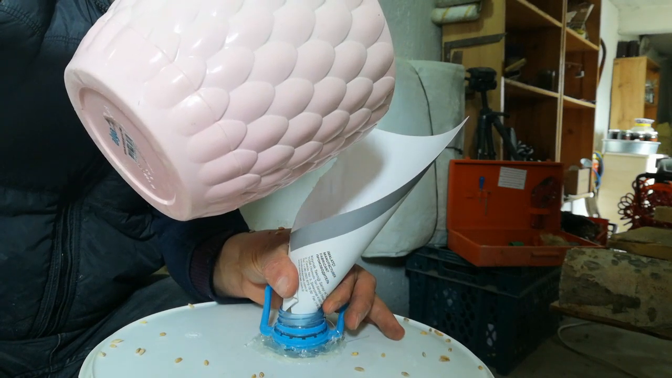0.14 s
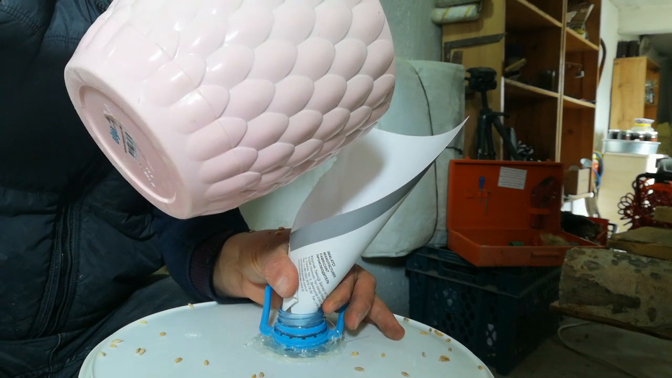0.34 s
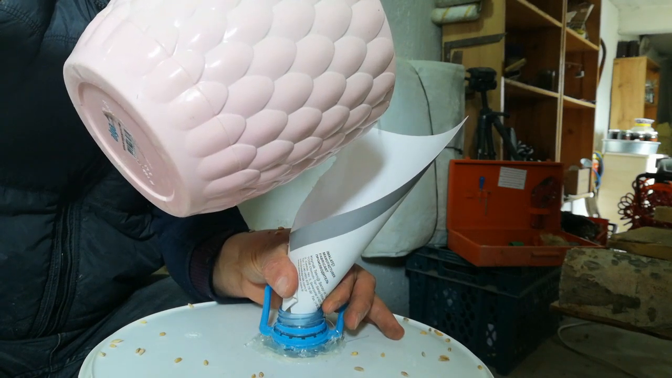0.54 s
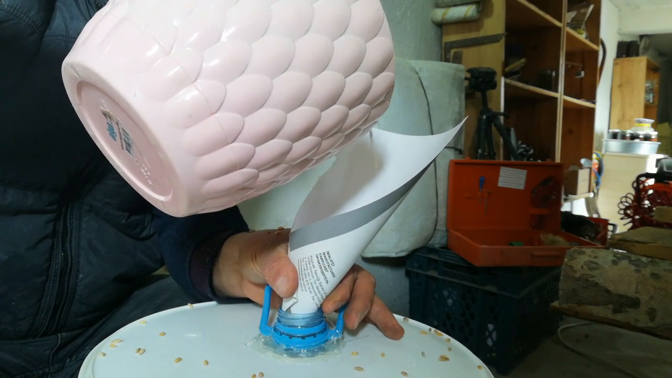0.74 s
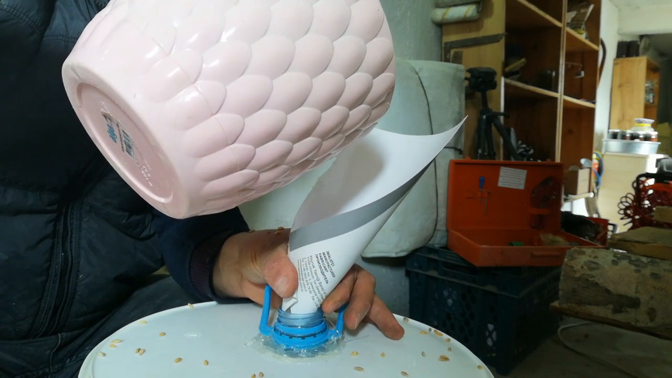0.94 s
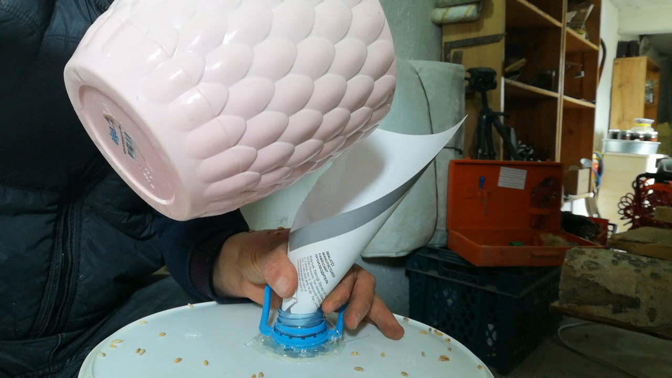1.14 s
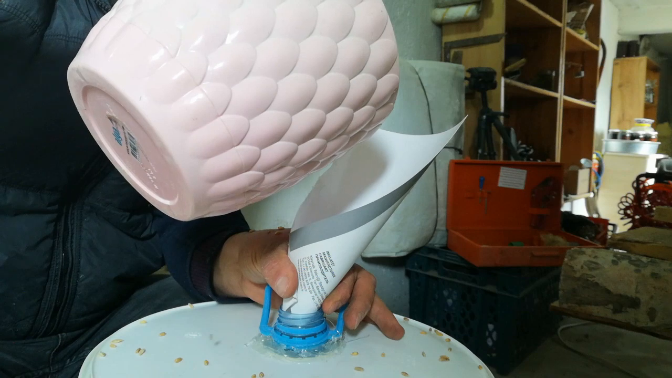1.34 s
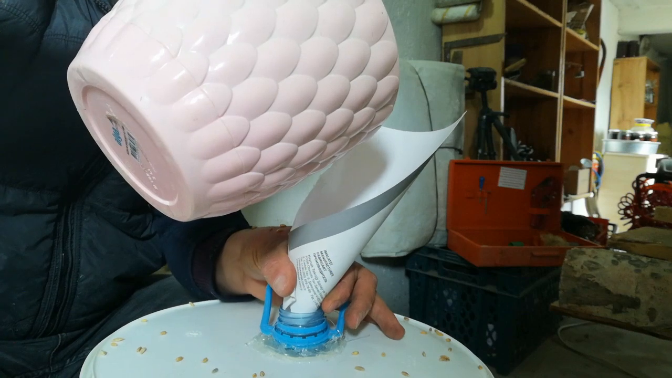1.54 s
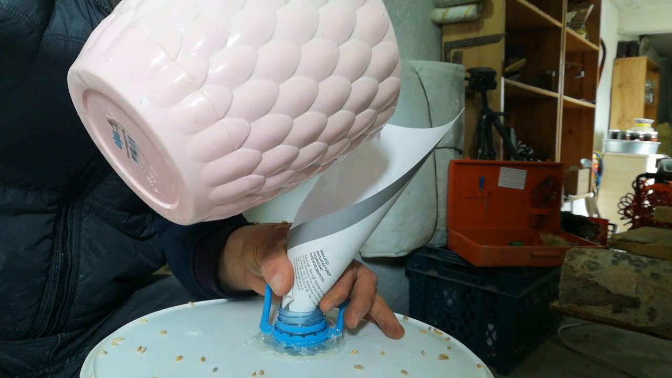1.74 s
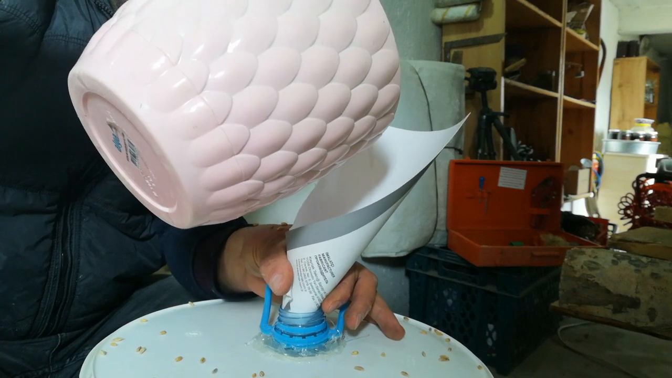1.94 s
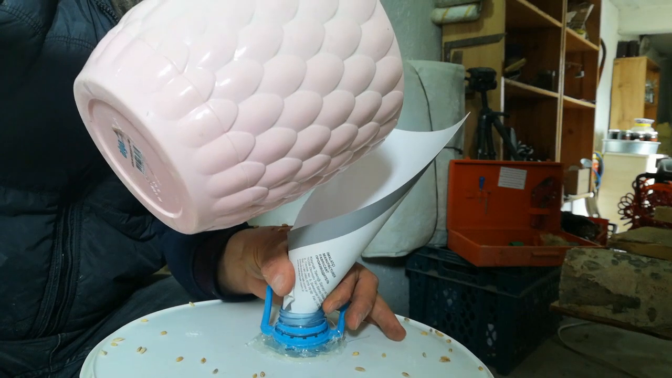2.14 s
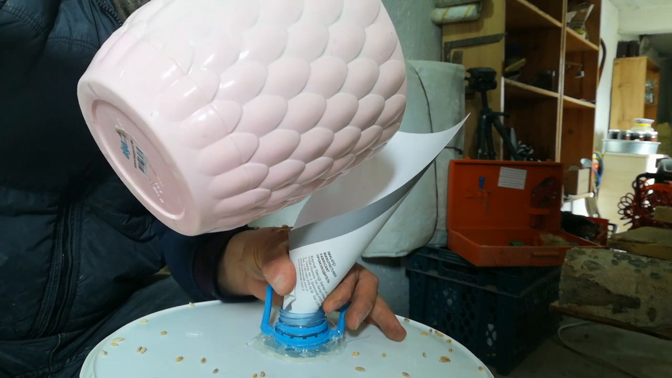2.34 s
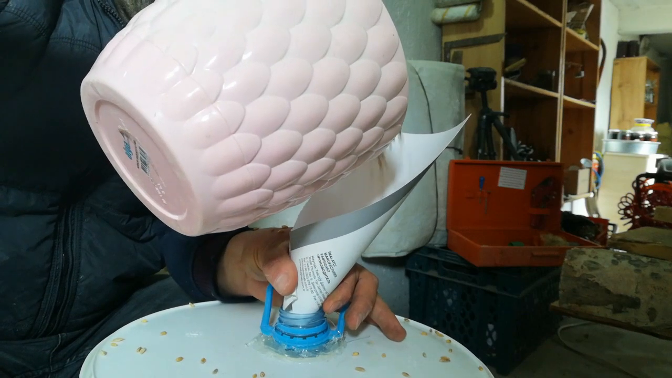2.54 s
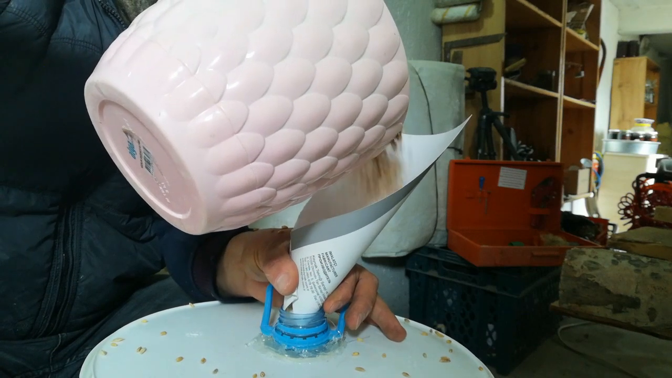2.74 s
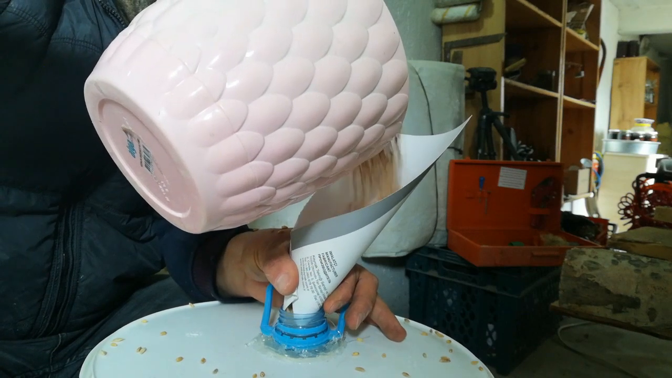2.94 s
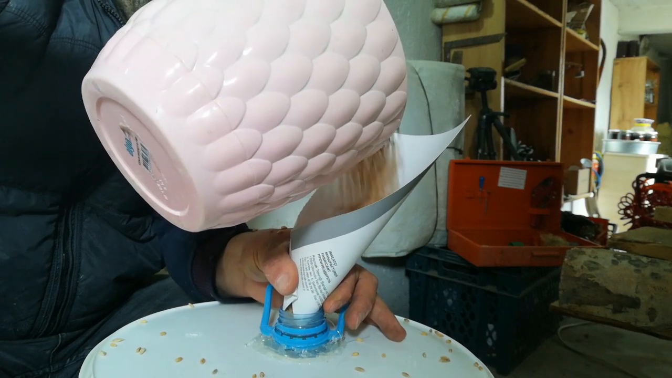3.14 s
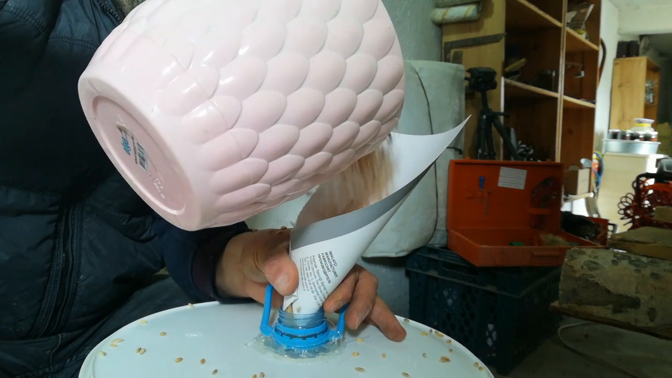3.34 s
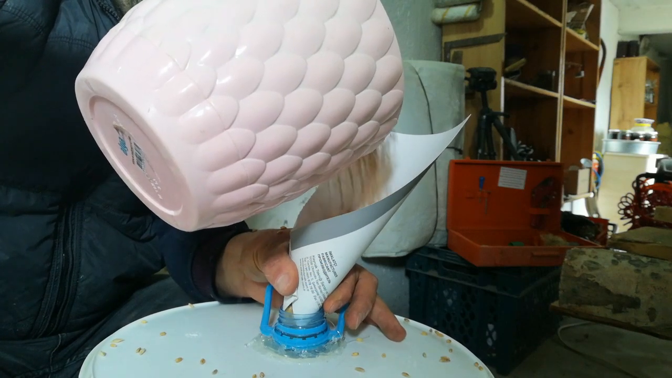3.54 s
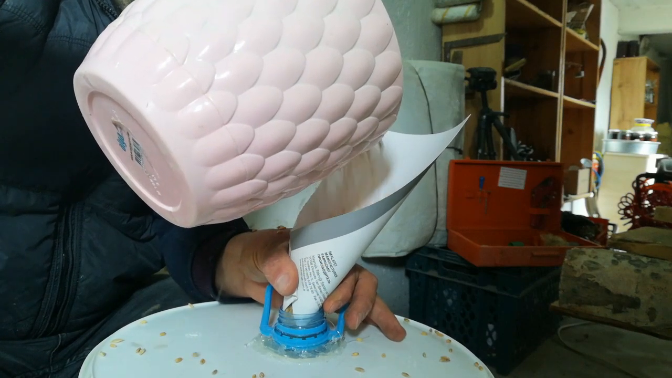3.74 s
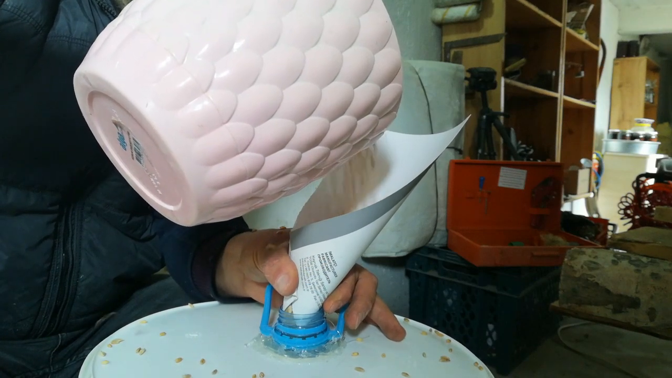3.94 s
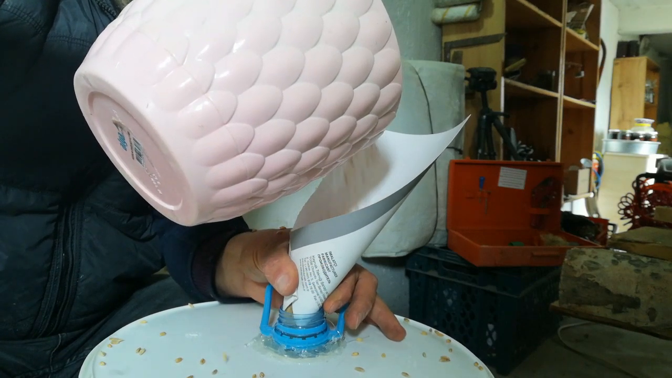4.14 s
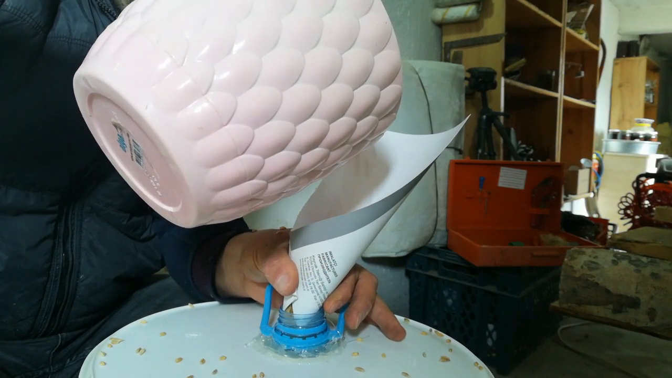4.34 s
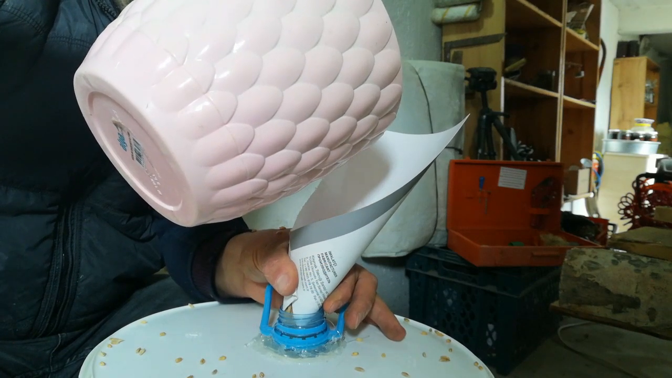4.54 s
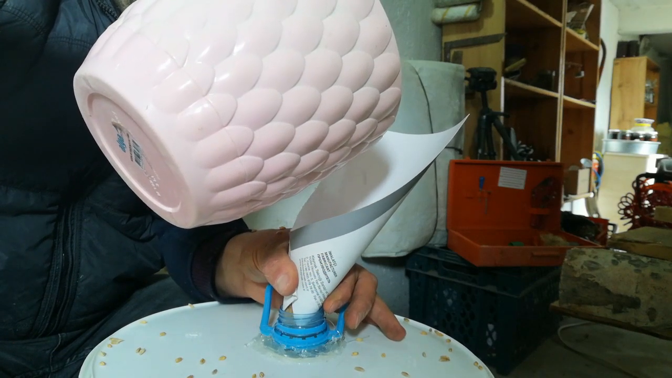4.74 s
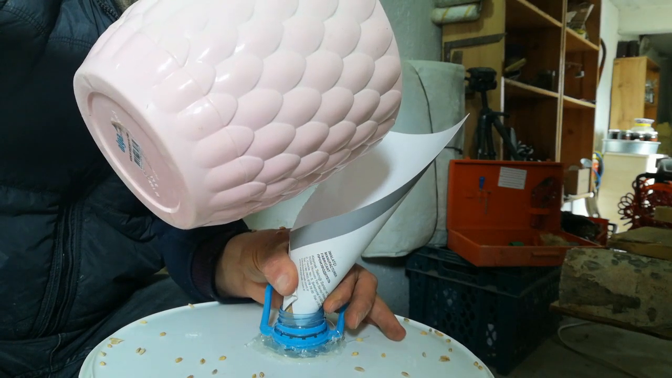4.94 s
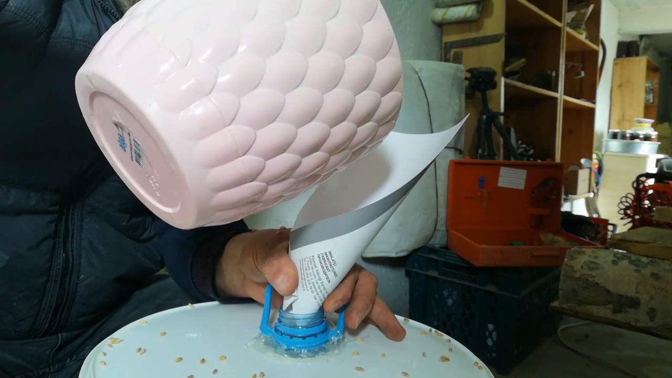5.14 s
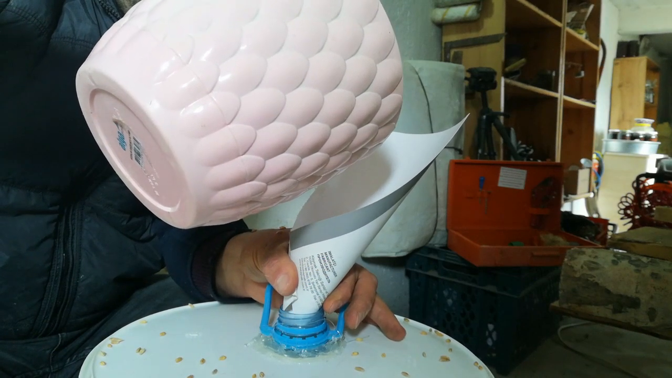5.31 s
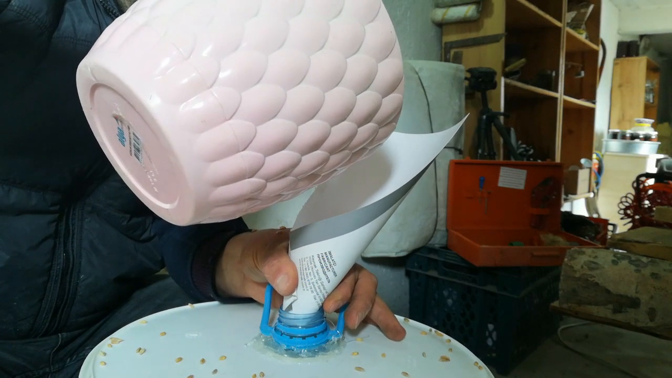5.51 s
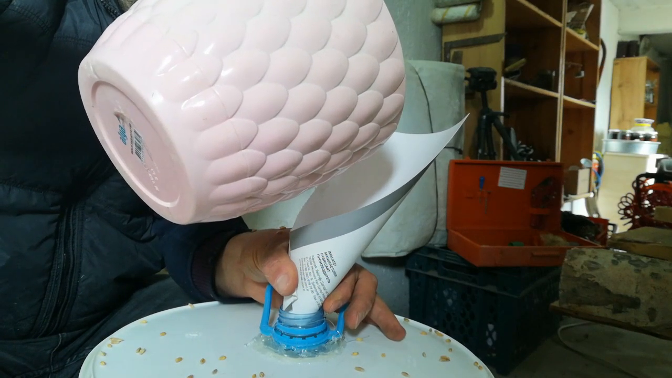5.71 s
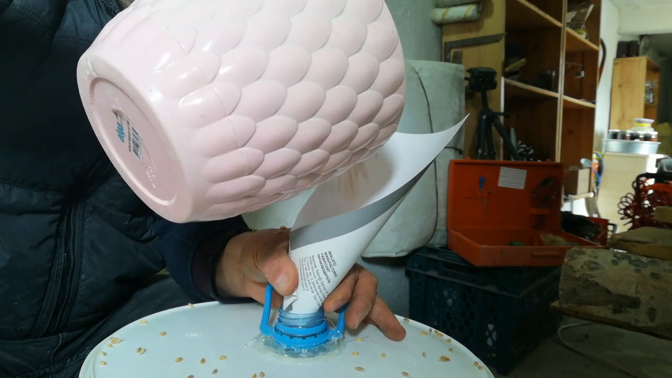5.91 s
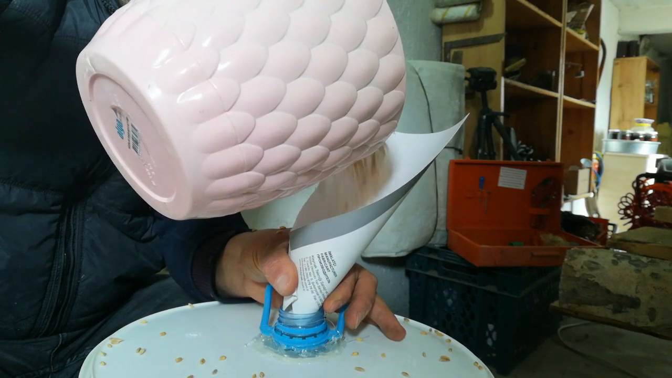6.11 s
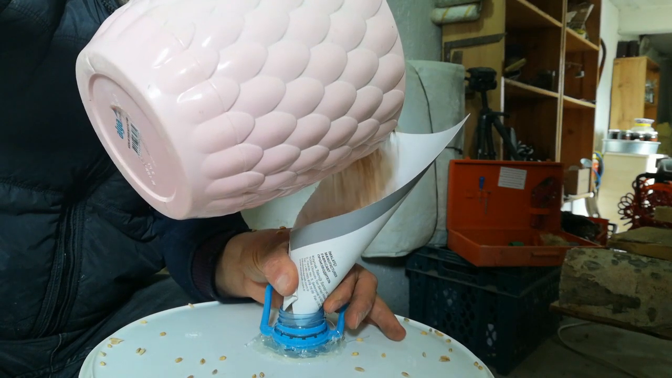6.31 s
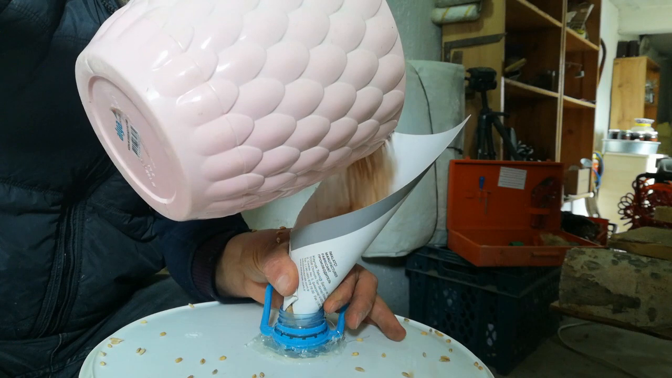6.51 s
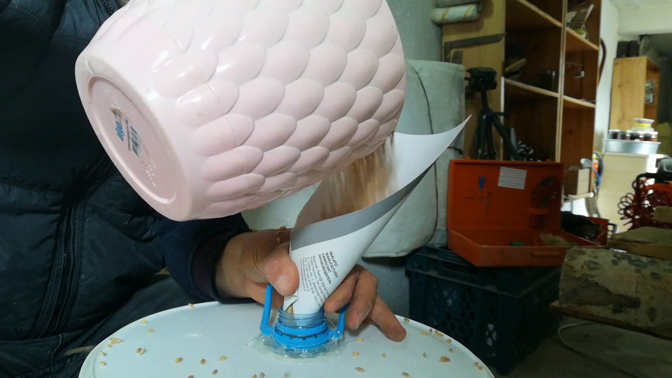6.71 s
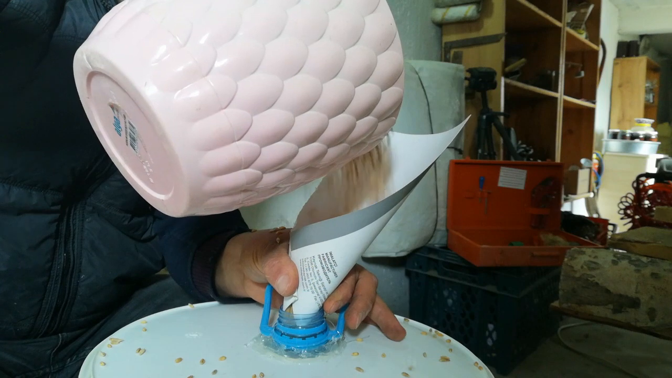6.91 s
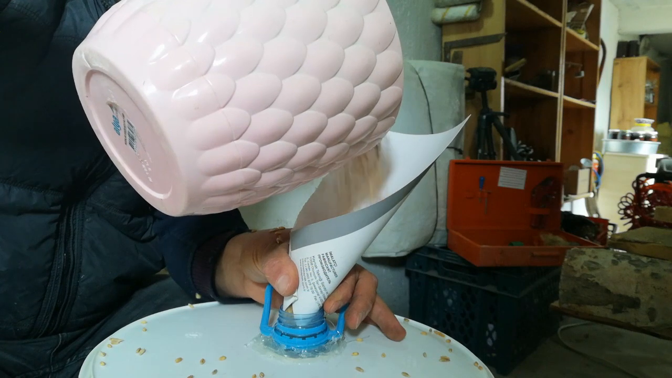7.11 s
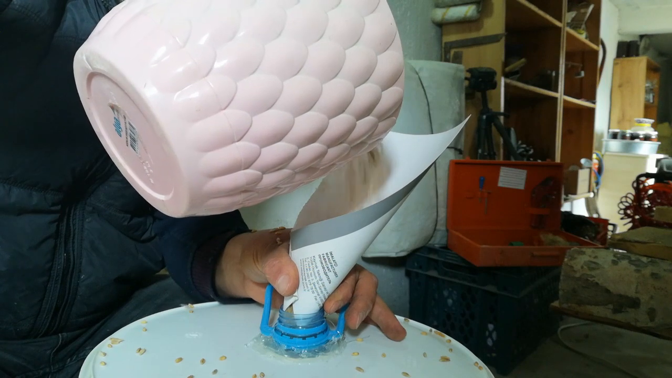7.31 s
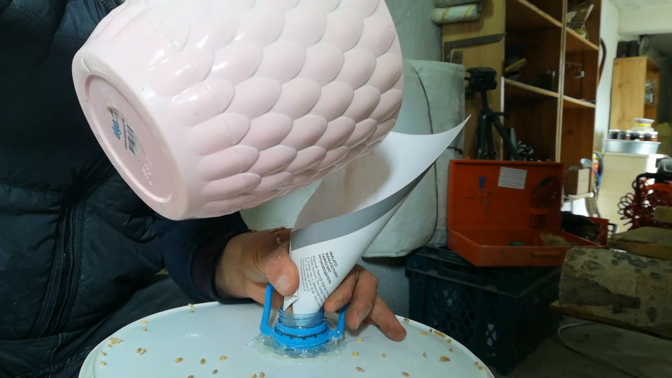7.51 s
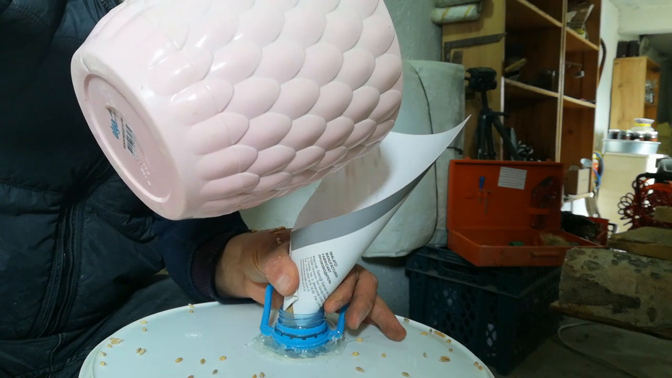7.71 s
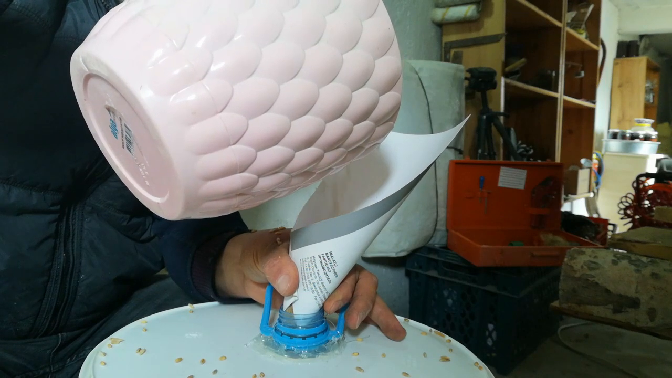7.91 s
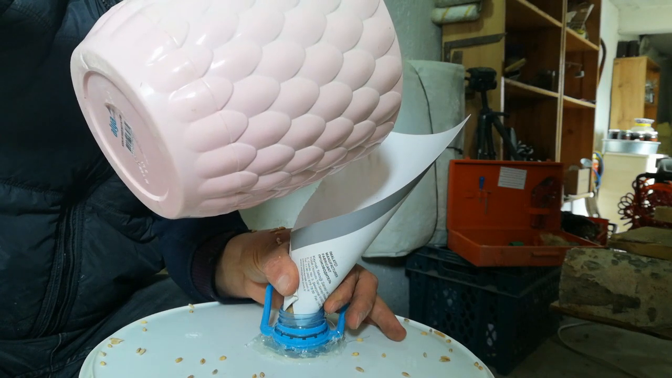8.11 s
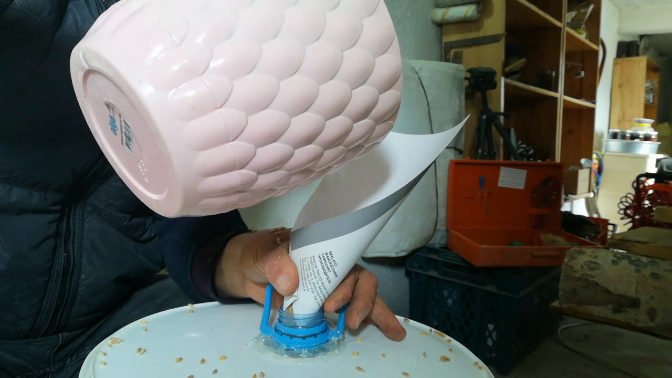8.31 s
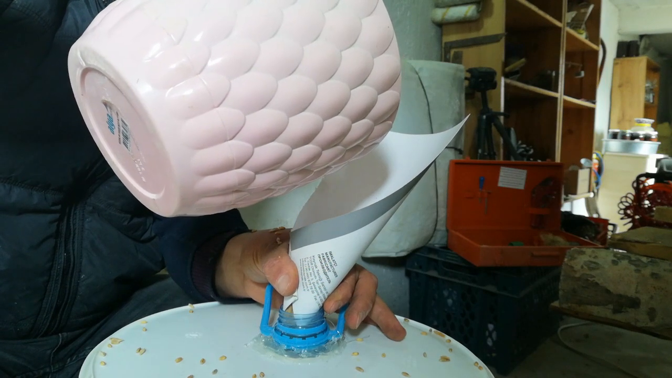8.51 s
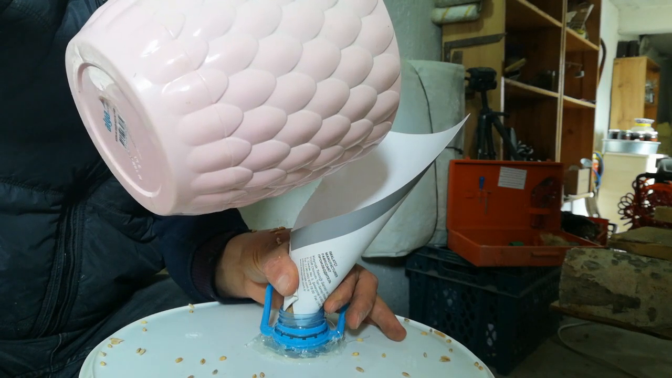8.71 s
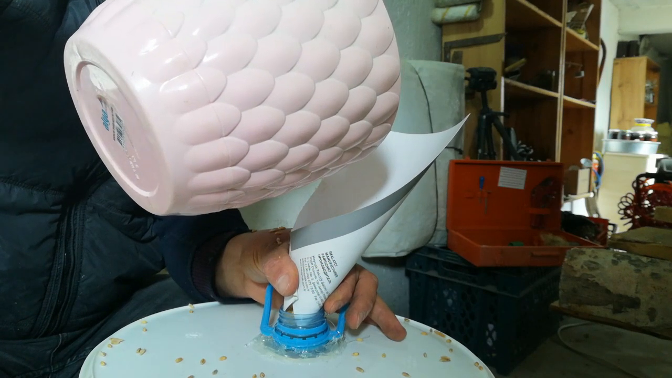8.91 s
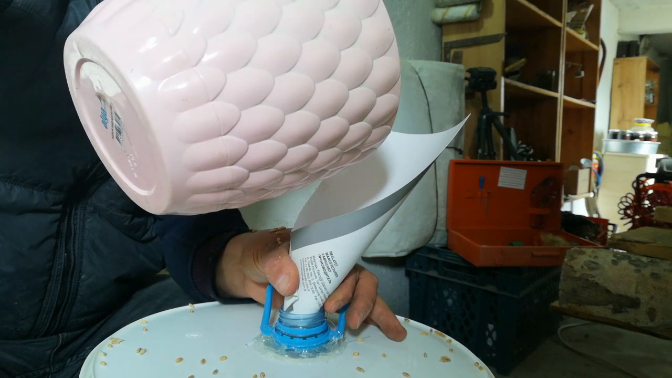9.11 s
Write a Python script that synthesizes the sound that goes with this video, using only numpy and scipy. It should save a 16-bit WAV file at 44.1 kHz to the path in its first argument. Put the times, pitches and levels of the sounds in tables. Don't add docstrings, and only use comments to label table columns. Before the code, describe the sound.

Dry seeds hiss down a paper funnel into a plastic bottle in three loud pours, thinning to sharp separate ticks between them, close up.

```python
import sys
import numpy as np
from scipy import signal
from scipy.fft import rfft, irfft, next_fast_len
from scipy.io import wavfile
from scipy.ndimage import uniform_filter1d

SR = 44100
rng = np.random.default_rng(int(sys.argv[2]) if len(sys.argv) > 2 else 0)


def wav_record(signal):
    frames = np.transpose(np.atleast_2d(signal))
    bounded = np.clip(frames, -1, 1)
    quanta = np.round(bounded * 32767).astype(np.int16)
    wavfile.write(sys.argv[1], SR, quanta)


def makeup_ratio(level_db):
    decades = np.asarray(level_db, float) / 20
    return 10 ** decades


N = 403956

# (start [s], crest [s], crest level [dB], pot runs low [s], extra fade [dB/s])
POURS = [
    (-1.3, -.6, -14, .9, 45),
    (2.57, 3.3, -12.8, 4.62, 45),
    (6.052, 6.6, -12.8, 8.1, 4.5),
]
# (start [s], length [s], level [dB], brightness [dB])
SPILLS = [(1.1, .3, -40, -2), (1.3, .47, -50, 0), (1.78, .22, -30, -9), (2.0, .2, -29, -8),
          (2.24, .04, -24, -15), (2.44, .14, -35, -2), (4.8, .62, -36, -.5), (5.4, .17, -44, -4),
          (5.55, .25, -56, -8), (5.931, .06, -24, -8), (9.13, .1, -31, 0)]
# (frequency [Hz], left [dB], right [dB])
PORT_COLOUR = [(40, -33, -26), (417, -19, -21), (597, -25.5, -23), (772, -14, -16), (1310, -8, -7.5),
               (1940, -4.5, -6), (2655, -4, 0.5), (4150, 0, -2.5), (5300, -2.5, 0), (6160, 0, -2),
               (8240, -8, 4), (9080, -9, 2.5), (10750, -20, -8.5), (15500, -35, -20)]
# (frequency [Hz], width [Hz], level [dB])
PAPER_MODES = [(732, 84, 4.5), (1057, 200, 3.5), (1330, 130, 4), (1820, 110, 3), (3350, 150, 3),
               (4820, 450, 1.2), (6300, 650, 1.5)]
# (time [s], peak level [dB], brightness [dB], rustle [dB])
FIRST_TAIL_SEEDS = [(0.1161, -7, -6, 3), (0.164, -5, -5, -15), (0.189, -10, -11, 1), (0.2523, -3, -14, -2),
                    (0.3252, -9, -19, 2), (0.4015, -2, -12, -6), (0.4643, -12, -14, 1),
                    (0.5043, -5, -12, -2), (0.5222, -8, -22, -3), (0.5686, -5, -8, 0), (0.6135, -3, -11, 1),
                    (0.6639, -4, -14, -3), (0.7447, -4, -13, -1), (0.8435, -5, -15, 2),
                    (0.9009, -9, -11, -1), (0.9388, -9, -8, 4), (0.9981, -6, -8, -5), (1.0226, -4, -14, -3),
                    (1.0695, -8, -7, 3), (1.0939, -7, -14, -6)]
SPARSE_SEEDS = [(1.1228, -7, -17, -3), (1.1404, -8, -18, -3), (1.1458, -4, -24, -4), (1.2002, -4, -19, -4),
                (1.2614, -13, -12, -3), (1.2705, -5, -16, 3), (1.3169, -8, -7, 5), (1.3488, -4, -13, -3),
                (1.3768, -11, -14, -7), (1.4282, -12, -4, -3), (1.4314, -9, -12, -6),
                (1.4785, -16, -11, -6), (1.5125, -20, -15, 2), (1.5509, -23, -9, -3), (1.5589, -3, -12, -3),
                (1.5778, -3, -12, -5), (1.6134, -17, -13, -4), (1.6606, -25, -11, -1),
                (1.6836, -10, -13, 1), (1.724, -16, -20, -2), (1.7764, -12, -14, -3),
                (1.7858, -7, -15, -13), (1.8138, -10, -15, -3), (1.8244, -14, -17, -3),
                (1.8394, -11, -15, -3), (1.8572, -9, -10, -3), (1.8754, -9, -11, -1),
                (1.8954, -10, -12, 11)]
DRIBBLE_SEEDS = [(1.918, -2, -6, -3), (1.9405, -6, -15, -3), (1.9495, 1, -8, -3), (1.9674, -6, -14, 4),
                 (1.9939, -6, -7, -4), (2.0243, -6, -7, -7), (2.0467, -8, -14, 11), (2.0712, -2, -17, -3),
                 (2.0774, 0, -8, -4), (2.1171, -7, -7, -3), (2.155, -9, -14, 0), (2.176, -6, -17, -3),
                 (2.1879, -6, -18, -11), (2.2204, -9, -11, -3), (2.2344, -3, -17, -3),
                 (2.2418, -2, -11, -4), (2.2643, -3, -18, -3), (2.2734, -11, -13, -3), (2.2917, -4, -19, 5),
                 (2.3384, -8, -13, 1), (2.3605, -6, -16, -3), (2.4409, -4, -12, -6), (2.4848, -9, -16, -5),
                 (2.5177, -7, -7, -2), (2.5511, -5, -12, -6), (2.582, -8, -13, -3), (2.6155, -2, -14, -3),
                 (2.7018, -5, -9, -3), (2.7197, -3, -6, -1)]
TRICKLE_SEEDS = [(4.6573, -6, -9, 0), (4.7995, -10, -12, -3), (4.8504, -12, -9, -2), (4.8873, -9, -12, 2),
                 (5.0789, -15, -11, 0), (5.1034, -13, -13, 0), (5.1522, -10, -15, 0),
                 (5.2679, -18, -15, -2), (5.2854, -19, -15, -2), (5.3363, -18, -18, -4),
                 (5.3936, -16, -17, -2), (5.4136, -19, -11, -12), (5.4365, -11, -13, -1),
                 (5.466, -18, -16, -6), (5.4874, -20, -16, -3), (5.5174, -18, -17, 6),
                 (5.5468, -16, -17, -2), (5.5614, -20, -14, 9), (5.5962, -16, -15, -4),
                 (5.674, -28, -14, -2), (5.7538, -31, -19, -1), (5.8257, -35, -13, -2),
                 (5.8386, -32, -16, 5), (5.9314, -7, -13, -5), (5.9534, -6, -14, -2), (5.9674, -2, -9, -1),
                 (6.0287, -9, -10, 3), (6.0606, -5, -6, -2), (6.0776, -5, -15, 2), (6.1114, -2, -12, 5)]
LAST_TAIL_SEEDS = [(7.8208, -1, -8, 2), (7.9305, -9, -9, -1), (8.0039, -8, -6, -4), (8.0543, -7, -11, -2),
                   (8.0722, -6, -12, -5), (8.1276, -9, -6, 0), (8.1775, -8, -14, -1), (8.2144, -7, -8, 3),
                   (8.3675, -17, -9, -1), (8.394, -11, 1, -9), (8.5955, -14, -11, 2),
                   (8.6299, -12, -12, -4), (8.6818, -6, -11, -6), (8.7582, -11, -8, -1),
                   (8.9392, -13, -12, -3), (9.1388, -8, -9, -7)]
# (frequency [Hz], width [Hz], level [dB])
BOTTLE_MODES = [(226, 33, 4), (296, 80, -3), (375.4, 40, -2), (459, 33, -12)]
# (frequency [Hz], rms level [dB])
HUM_PARTIALS = [(115, -60), (153, -48), (306, -74)]
# (frequency [Hz], density [dB per Hz])
ROOM_AIR = [(30, -9), (100, -12), (170, -10), (260, -18), (500, -26), (2000, -17), (5000, -23), (9000, -26),
            (15000, -32)]

STEP = 64
RISE_DB, SURGE_DB, SURGE_S = 9, 4.2, .33
DRAIN_DB_PER_S, SPILL_STOP_DB_PER_S = 5.5, 200
BRIGHT_DB, BRIGHT_AFTER_DB, DULLING_DB_PER_S = 1, 4, 2.2
SWING_S, SWING_WIDTH_S, SWING_DB, PAN_DB = .42, .15, -8, 2.6
SEEDS_PER_S, FEWEST_PER_S, MOST_PER_S, SIZE_SPREAD_DB = 500, 500, 6000, 3.1
PLACES, RING = 12, 8192
LEAD = 64
TICK_T60_S, RATTLE_T60_S, ROOM_T60_S, TICK_DB = .005, .017, .25, -2.5
RATTLE_RISE_S = .00095
BODY_DB, BODY_SLOPE, BODY_SURGE_DB = -6.3, 1.05, 1.5
BOOM_DB, BOOM_SLOPE, BOOM_SURGE_DB, BOOM_KNEE_DB = -46, .15, 9, -35
DROP_S = .15
ROOM_AIR_DB = -52


def flow():
    t = np.arange(0, N + STEP, STEP) / SR
    power, treble, surge, pan_db = makeup_ratio(-124), makeup_ratio(-130), 0, PAN_DB
    for start, crest, crest_db, empty, fade_db in POURS:
        since = np.maximum(t - crest, 0)
        settled = np.minimum(since / SURGE_S, 1)
        rising = np.clip((t - start) / (crest - start), 0, 1)
        db = crest_db - RISE_DB * (1 - rising) ** 1.5 - SURGE_DB * settled
        db = db - DRAIN_DB_PER_S * since - fade_db * np.maximum(t - empty, 0)
        bright_db = BRIGHT_DB + BRIGHT_AFTER_DB * settled - DULLING_DB_PER_S * since
        power = power + (t > start) * makeup_ratio(2 * db)
        treble = treble + (t > start) * makeup_ratio(2 * (db + bright_db))
        surge = surge + rising * (1 - settled)
        pan_db = pan_db + SWING_DB * np.exp(-((t - crest - SWING_S) / SWING_WIDTH_S) ** 2)
    for start, length, level_db, bright_db in SPILLS:
        db = level_db - SPILL_STOP_DB_PER_S * np.maximum(t - start - length, 0)
        power = power + (t > start) * makeup_ratio(2 * db)
        treble = treble + (t > start) * makeup_ratio(2 * (db + bright_db))
    curves = (10 * np.log10(power), 10 * np.log10(treble), surge, pan_db)
    return [np.interp(np.arange(N) / SR, t, c) for c in curves]


def stream(rattle_db, sizzle_db, body_db, pan_db):
    size = next_fast_len(N + RING, True)
    when, thinning, grain, place = rng.random((int(MOST_PER_S * N / SR), 4)).T
    at = (when * N).astype(int)
    rate = SEEDS_PER_S * makeup_ratio(1.3 * (rattle_db + 25.5) + 0.5 * walk(18))
    rate = np.clip(rate, FEWEST_PER_S, MOST_PER_S)
    mean_rate = np.clip(SEEDS_PER_S * makeup_ratio(1.264 * (rattle_db + 28)), FEWEST_PER_S, MOST_PER_S)
    falls = np.clip((rate[at] / MOST_PER_S - thinning) * 50 + .5, 0, 1)
    blow = falls * makeup_ratio(-SIZE_SPREAD_DB * np.log(grain + 0.012)) / np.sqrt(mean_rate[at])
    spot = (place * PLACES).astype(int)
    total = 0
    for k, bright_db in enumerate(np.linspace(-3, 3, PLACES)):
        impacts = np.bincount(at[spot == k], blow[spot == k], N)
        total = total + rfft(impacts, size) * rfft(landing(bright_db, -4.5, bounce=0.32), size)
    hz = np.fft.rfftfreq(size, 1 / SR)
    low = 1 / (1 + (hz / 2200) ** 4)
    high = 1 / (1 + (6600 / (hz + 1)) ** 6)
    heap = 1 / (1 + ((hz - 4600) / 500) ** 2)
    parts = ((heap, 2.41 * rattle_db + 6),
             (low, body_db - 1.5 + .8 * walk(9)),
             (1 - low - high, rattle_db + 3.5 + np.array([pan_db, -pan_db]) / 2),
             (high, sizzle_db + 2 + .6 * walk(12)))
    return sum(unit(irfft(total * share, size)[:, LEAD:N + LEAD]) * makeup_ratio(db) for share, db in parts)


def landing(bright_db, rustle_db, bounce):
    t, hz = np.arange(RING) / SR, np.fft.rfftfreq(RING, 1 / SR)
    shared, left, right = rfft(rng.standard_normal((3, RING)))
    alike = np.clip(0.58 * np.exp(-np.log((hz + 1) / 1300) ** 2 / 1.76), 0, 1)
    late = np.exp(-2j * np.pi * hz * np.array([[.00006], [0]]))
    noise = irfft(np.sqrt(alike) * shared * late + np.sqrt(1 - alike) * np.array([left, right]))
    decays = ((TICK_T60_S, TICK_DB), (RATTLE_T60_S, 0), (ROOM_T60_S, rustle_db))
    power = sum(makeup_ratio(db) ** 2 / t60 * np.exp(-2 * np.log(1000) * t / t60) for t60, db in decays)
    power = power * (1 - np.exp(-t / RATTLE_RISE_S)) ** 2
    gap, strength = rng.random(2)
    delay = int((0.00095 + 0.00536 * gap) * SR)
    power = power + bounce * strength * np.roll(power, delay) * (t > .001)
    burst = np.roll(noise * np.sqrt(power * (1 - t / t[-1])), LEAD, axis=1)
    colour = np.array([curve(hz, PORT_COLOUR, column=1), curve(hz, PORT_COLOUR, column=2)])
    rings_db = sum(db / (1 + ((hz - f) / (w / 2)) ** 2) for f, w, db in PAPER_MODES)
    spot_db = 2.68 * np.interp(hz, np.arange(0, 23000, 1000), rng.standard_normal(23))
    tilt_db = bright_db * np.clip(np.log2((hz + 1) / 5000), -1.5, .8)
    out = irfft(rfft(burst) * colour * makeup_ratio(rings_db + spot_db + tilt_db))
    return out / np.sqrt(np.sum(out ** 2) / 2)


def single_seeds():
    out = np.zeros((2, N + RING))
    seeds = FIRST_TAIL_SEEDS + SPARSE_SEEDS + DRIBBLE_SEEDS + TRICKLE_SEEDS + LAST_TAIL_SEEDS
    for s, peak_db, bright_db, rustle_db in seeds:
        sound = landing(0.7 * (bright_db + 14), rustle_db - 4, bounce=0.12)
        start = max(int((s + .0004) * SR) - LEAD, 0)
        level = makeup_ratio(peak_db + np.array([[3.6], [3.8]]))
        out[:, start:start + RING] += sound / np.max(np.abs(sound)) * level
    return out[:, :N]


def bottle(boom_db):
    shared, left, right = rng.standard_normal((3, N)) * makeup_ratio(1.8 * walk(40))
    knocks = shared + 0.34 * np.array([left, right])
    boom = shape(knocks, lambda hz: sum(makeup_ratio(db) / (1 + ((hz - f) / (w / 2)) ** 2)
                                        for f, w, db in BOTTLE_MODES))
    return unit(boom) * makeup_ratio(boom_db)


def room():
    t = np.arange(N) / SR
    hum = 0
    for f, db in HUM_PARTIALS:
        level = np.sqrt(2) * makeup_ratio(db + .3 * walk(7.8))
        hum = hum + level * np.sin(2 * np.pi * f * t + 0.4 * walk(2.3))
    shared, left, right = rng.standard_normal((3, N))
    air = shape(shared + 1.2 * np.array([left, right]), lambda hz: curve(hz, ROOM_AIR, column=1))
    return hum + unit(air) * makeup_ratio(ROOM_AIR_DB)


def curve(hz, table, column):
    rows = np.array(table)
    return makeup_ratio(np.interp(np.log(hz + 1), np.log(rows[:, 0]), rows[:, column]))


def shape(x, gain):
    size = next_fast_len(N, True)
    return irfft(rfft(x, size) * gain(np.fft.rfftfreq(size, 1 / SR)), size)[..., :N]


def unit(x):
    return x / np.sqrt(np.mean(x ** 2))


def walk(rate):
    k = int(SR / rate)
    held = np.repeat(rng.standard_normal(N // k + 1), k)[:N]
    return unit(uniform_filter1d(held, k))


def scene():
    t = np.arange(N) / SR
    rattle_db, sizzle_db, surge, pan_db = flow()
    body_db = -20 + BODY_DB + BODY_SLOPE * (rattle_db + 20) + BODY_SURGE_DB * surge
    duck_db = -1.2 * uniform_filter1d(np.maximum(rattle_db + 22, 0), 8000)
    poured = stream(rattle_db, sizzle_db, body_db, pan_db)
    single = single_seeds()
    falling_db = np.interp(t - DROP_S, t, uniform_filter1d(rattle_db, size=2000))
    boom_db = BOOM_DB + BOOM_SLOPE * (falling_db + 20) + 1.3 * np.minimum(falling_db - BOOM_KNEE_DB, 0)
    boom_db = boom_db + BOOM_SURGE_DB * surge + 1.6 * walk(11)
    return poured + single + bottle(boom_db) + room() * makeup_ratio(duck_db)


def top_cut(x):
    return signal.sosfilt(signal.butter(12, 15340, fs=SR, output="sos"), x)


def record(dry):
    flat = np.clip(0.99 * dry, -1, 1)
    return top_cut(flat)


dry = scene()
out = record(dry)
wav_record(out)
```